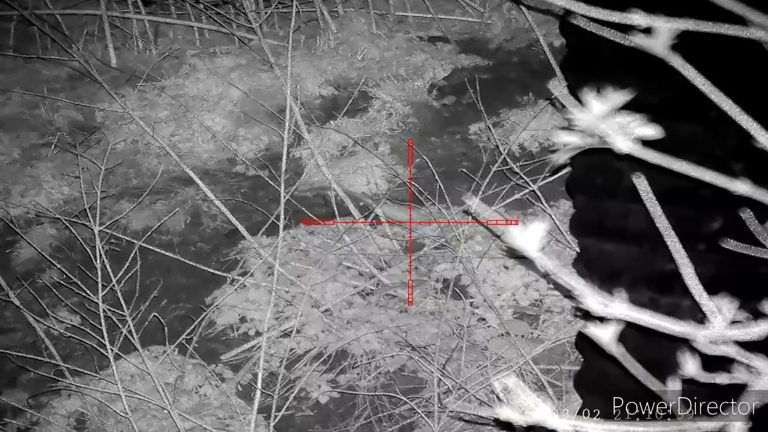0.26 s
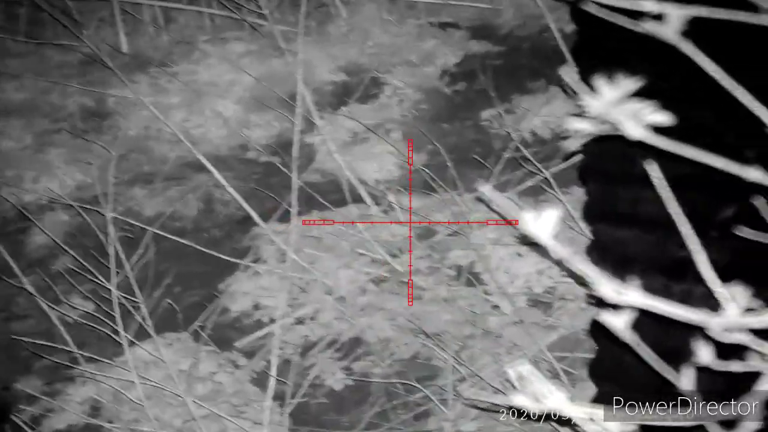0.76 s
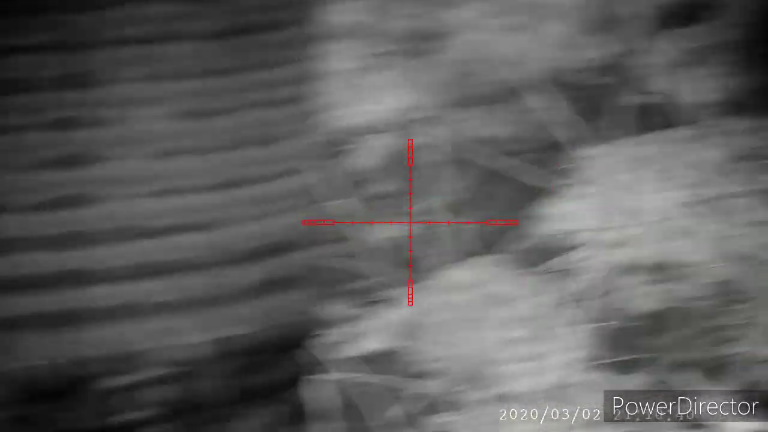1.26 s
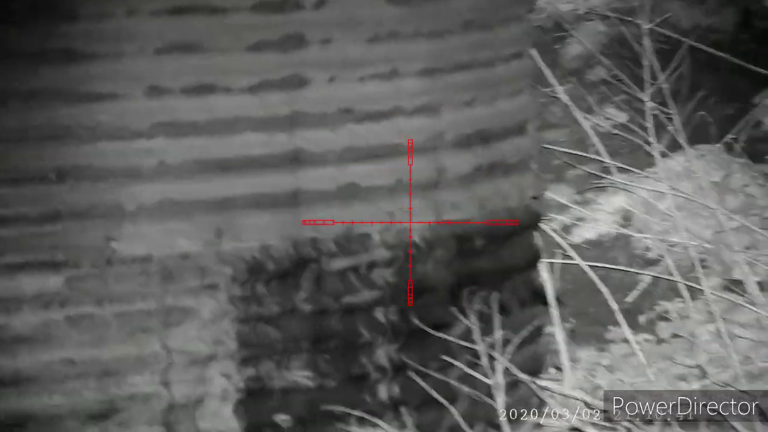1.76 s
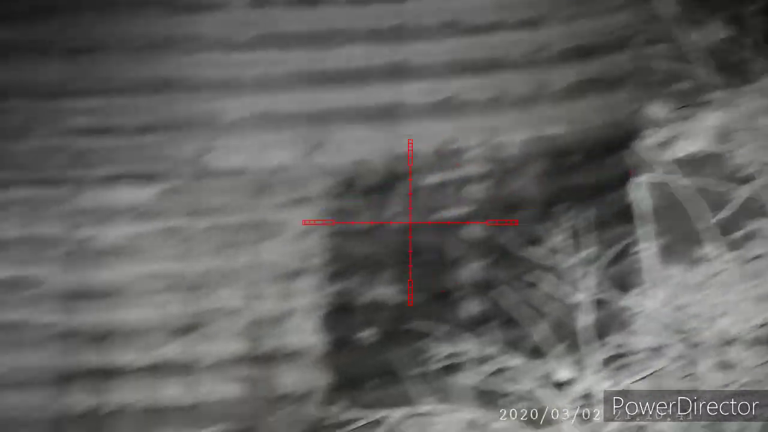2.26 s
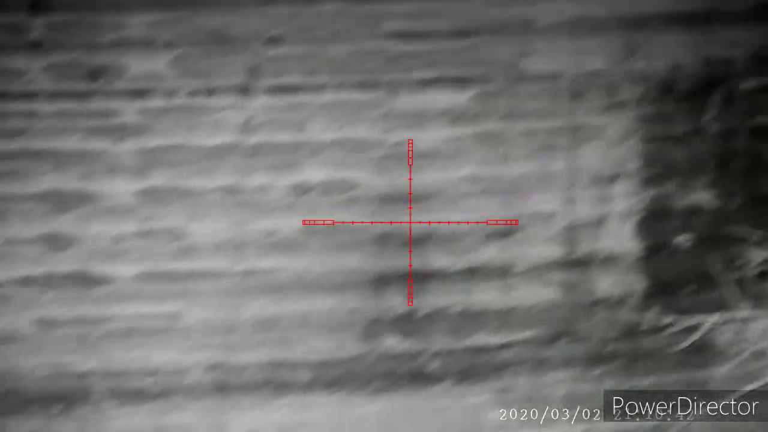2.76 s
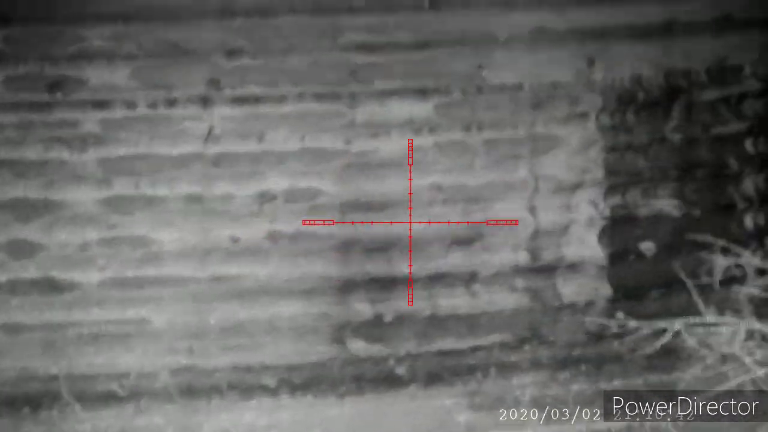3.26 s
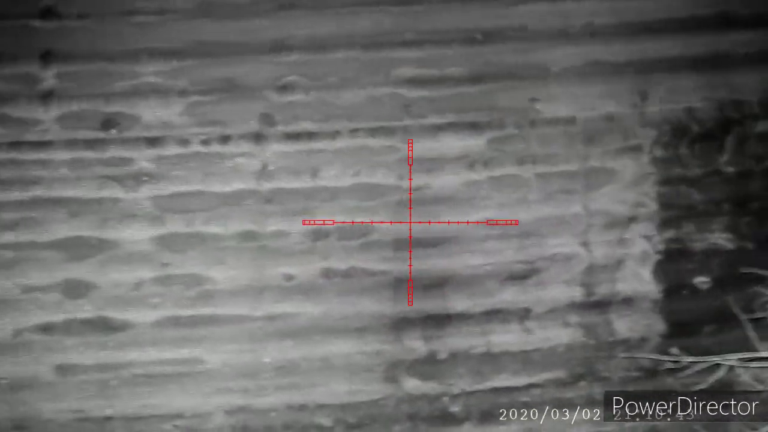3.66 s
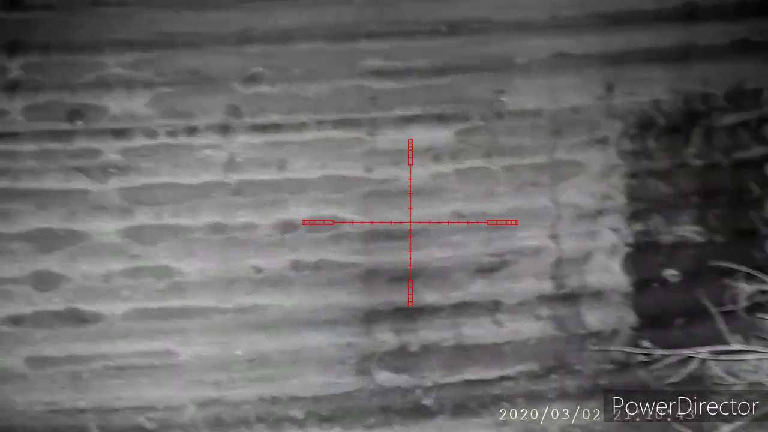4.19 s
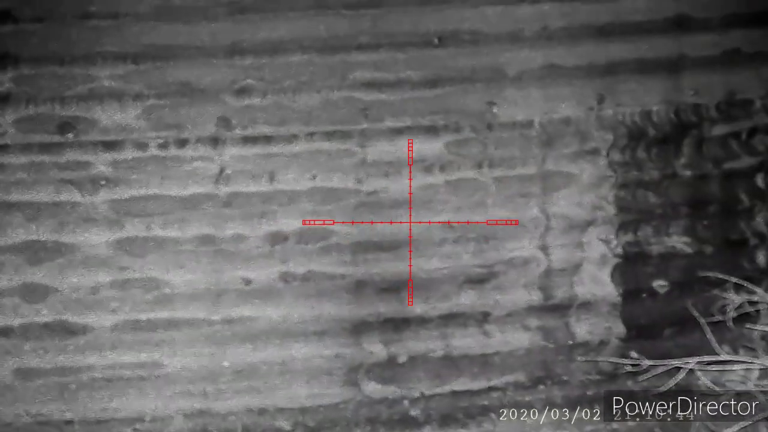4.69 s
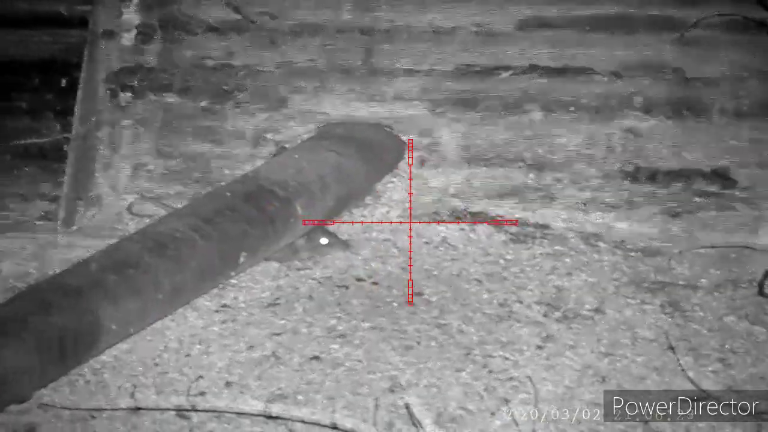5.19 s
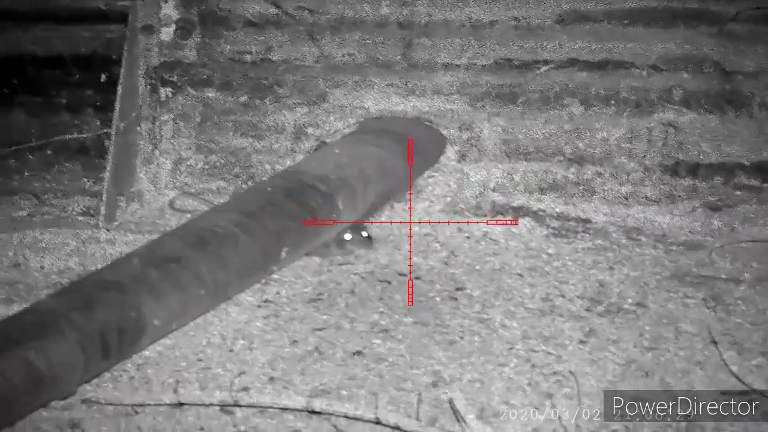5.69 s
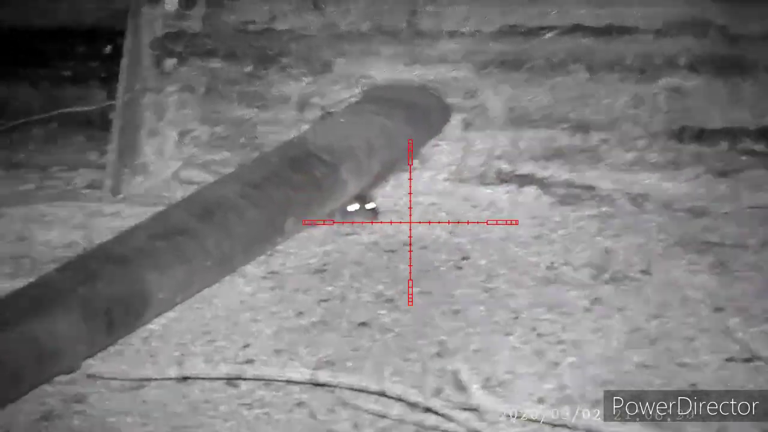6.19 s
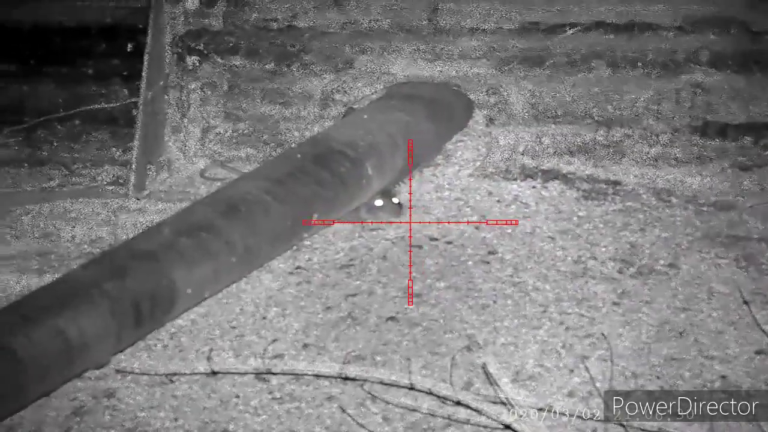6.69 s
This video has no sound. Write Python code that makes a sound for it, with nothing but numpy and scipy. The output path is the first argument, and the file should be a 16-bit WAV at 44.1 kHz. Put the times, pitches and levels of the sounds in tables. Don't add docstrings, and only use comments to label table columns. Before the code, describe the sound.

The built-in microphone sits right beside fingers on a hard housing, so contacts are dry, close and barely reverberant. Small ticks and scuffs grow into busy rubbing with low pressure bumps and one overloaded thud. Two bright, brittle snaps stand out, the second right after a momentary dropout and followed by quick clicks. Faint electronic hiss and high whine rise and fall throughout; the ending is nearly still.

```python
import sys
import numpy as np
from scipy import signal
from scipy.fft import rfft, irfft, next_fast_len
from scipy.io import wavfile
from scipy.ndimage import uniform_filter1d, map_coordinates

SR = 44100
rng = np.random.default_rng(int(sys.argv[2]) if len(sys.argv) > 2 else 0)


def put_to_file(sound):
    columns = np.atleast_2d(sound).T
    safe = np.clip(columns, -1, 1)
    whole_steps = np.round(safe * 32767)
    wavfile.write(sys.argv[1], SR, whole_steps.astype(np.int16))


def invert_db(x):
    u = np.asarray(x, float) / 20
    return 10 ** u


N = 306304
T = np.arange(N) / SR

# pitch_hz, t60_s, polarity, rubbed_db, tapped_db, first_snap_db, second_snap_db
HOUSING = [(1260, 0.013, 1, 7, 6, -42, -42.5), (1348, 0.03, 0.59, 3, 0, -37, -45.5),
           (1480, .045, 0.88, -9.5, 10.5, -23.5, -28), (1535, 0.016, 0.94, -1, -27.5, -27.5, -12),
           (1684, .012, -1, -3, -25, -30.5, -30), (1760, 0.025, -1.6, 0, 0, -29, -24.5),
           (2731, 0.016, 1, -5.5, -10, -10.5, -7), (3450, .015, 1, -1.5, -12.5, -1, -1),
           (4096, 0.017, 1, -7, -9, -8, -12.5), (4610, 0.0068, -0.47, -10, -10, -10, -29.5),
           (5210, 0.015, -1, 1.5, 3.5, -2, -11.5), (5496, 0.014, -1, 0, -7, -12.5, -14),
           (6175, 0.012, 0.97, 2, 2.5, -9, -10), (6830, .009, -0.65, -15, -16.5, -8.5, -20.5),
           (7190, 0.011, -1, -9, -3, 0, 2), (8460, 0.012, -1.4, -4, -9.5, -19, -5.5),
           (9710, 0.0073, -1, -22.5, -9, -26.5, -28.5), (12300, 0.0071, -1, -12.5, -5.5, -18, -14)]


def unit(x):
    return x / np.sqrt(np.mean(x ** 2) + 1e-20)


def peak_at(db, x):
    return invert_db(db) * x / np.abs(x).max()


def butter(order, hz, kind, x):
    return signal.sosfilt(signal.butter(order, hz, kind, fs=SR, output="sos"), x)


def wobble(rate_hz):
    knots = rng.standard_normal(int(N * rate_hz / SR) + 4)
    return map_coordinates(knots, [T * rate_hz])


def curve(rows):
    return np.interp(T, *np.transpose(rows))


def add(track, start_s, x):
    part = track[round(start_s * SR):][:len(x)]
    part += x[:len(part)]


def ring(hz, t60_s, size=4096):
    t = T[:size]
    onset = 1 - np.exp(-t / 0.000055)
    return np.sin(2 * np.pi * hz * t) * invert_db(-60 * t / t60_s) * onset


def group(index, tapped=False):
    groups_hz = [900, 1400, 1700, 2200, 4350, 14000]
    low, high = groups_hz[index:index + 2]
    modes = sum(sign * invert_db(db[tapped]) * ring(hz, t60) for hz, t60, sign, *db in HOUSING if low < hz < high)
    return peak_at(0, butter(1, [low, high], "band", modes))


def struck(answer, length_s, db, size=4096):
    u = T[:size] / max(length_s, 5e-5)
    force = rng.standard_normal(size) * u * np.exp(-u)
    return peak_at(db, signal.fftconvolve(force, answer)[:])


def stroke(start_s, length_s):
    grip, flat = 0.8, 0.85
    phase = np.clip((T - start_s) / length_s, 0, 1) ** grip
    return np.abs(np.sin(np.pi * phase)) ** flat


def electronics():
    # start_s, level_db
    gain = [(0, -64), (.6, -61.5), (.9, -58.5), (1.2, -57.5), (1.5, -54), (2.05, -58), (2.25, -53.5),
            (3.5, -56.5), (3.95, -61), (4.91, -62), (4.95, -70), (5.05, -67.5), (5.12, -54), (5.33, -55.5),
            (5.5, -60.5), (6.05, -59.5), (6.4, -62.5), (6.95, -62)]
    # pitch_hz, density_db_per_hz
    hiss_colour = [(15, -13), (30, -6.5), (110, -1), (250, -1), (500, -3.5), (1000, -8), (2000, -14.5),
                   (3200, -19), (6300, -23), (10000, -23), (11700, -28), (12400, -23.5), (13100, -26.5),
                   (15500, -37)]
    # pitch_hz, level_db re fundamental
    whine_tones = [(4032, 0), (8064, -4.5), (12096, -20), (12349, -24)]
    m = next_fast_len(N)
    hz, db = np.transpose(hiss_colour)
    colour = invert_db(np.interp(np.log(np.fft.rfftfreq(m, 1 / SR) + 1), np.log(hz + 1), db))
    hiss = unit(irfft(rfft(rng.standard_normal(m)) * colour, m)[:N])
    drift_rad = 0.25 * wobble(2.5)
    whine = np.zeros(N)
    for hz, db in whine_tones:
        phase = 2 * np.pi * hz * T + drift_rad * hz / whine_tones[0][0]
        whine += invert_db(db) * 2 ** 0.5 * np.sin(phase)
    level = invert_db(curve(gain) + wobble(9.9))
    return level * (hiss * invert_db(0.64 * wobble(30)) + invert_db(-10) * whine)


def sway():
    # start_s, heave_db
    heave = [(0, -81), (1.04, -76), (1.1, -50), (1.38, -40), (1.7, -52), (1.95, -52), (2.26, -35),
             (2.55, -42), (3.04, -39.5), (3.3, -48), (3.5, -47.5), (3.94, -54), (4.9, -53), (5.03, -42),
             (5.1, -49), (5.37, -60), (5.62, -62), (6.95, -80)]
    # top_s, signed_peak, half_width_s
    lurch_rows = [(1.095, -0.0035, .012), (1.315, -0.019, 0.021), (1.4, 0.0082, 0.03),
                  (1.45, 0.019, 0.0096), (1.503, -0.027, 0.018), (1.592, 0.015, 0.04), (1.815, 0.01, 0.035),
                  (2.002, -0.043, 0.03), (2.09, 0.022, 0.017), (2.27, 0.032, 0.021), (2.33, -0.026, 0.021),
                  (2.418, 0.026, 0.019), (2.48, -0.01, .025), (2.58, 0.026, 0.019), (2.635, -0.024, 0.034),
                  (2.775, -0.016, 0.033), (2.856, 0.016, 0.017), (2.895, -0.029, 0.018),
                  (2.97, 0.0077, 0.044), (3.016, -0.011, .008), (3.04, -0.014, 0.0098),
                  (3.072, -0.009, 0.0066), (3.1, 0.01, 0.013), (3.15, -0.0019, 0.012),
                  (1.989, -0.026, .006), (2.365, 0.0068, 0.011), (2.822, 0.0064, 0.013),
                  (3.62, -0.0014, 0.023), (3.67, 0.0026, .025), (5.42, 0.0012, .03), (5.5, -0.0017, 0.026),
                  (3.186, 0.016, 0.01), (3.251, -0.028, 0.028), (3.341, -0.016, .015), (3.41, 0.01, 0.033),
                  (5.065, 0.038, 0.019), (5.24, -0.017, 0.071), (5.341, -0.0035, 0.053)]
    # top_s, peak, half_width_s
    resume = (4.954, .006, .016)
    rumble_db, rumble_db_per_db, still_db, tremor_db = -58, 0.94, -70.5, -4
    heave_db = curve(heave)
    lumps = invert_db(3 * wobble(15))
    rumble = butter(2, [20, 90], "band", rng.standard_normal(N))
    grip = invert_db(rumble_db + rumble_db_per_db * (heave_db + 37)) * unit(lumps * rumble)
    grip += invert_db(still_db) * unit(rumble[::-1])
    lurches = sum(peak * np.exp(-np.abs((T - s) / width) ** 3.2) for s, peak, width in lurch_rows + [resume])
    tremor = invert_db(heave_db + tremor_db) * unit(wobble(20) + 1.6 * wobble(45))
    return lurches + tremor + grip


def pushes():
    # top_s, signed_peak, rise_s, fall_s, rebound_share
    push_rows = [(1.271, 0.022, 0.02, 0.0024, 0.55), (1.561, -.03, 0.00052, 0.006, 0.11),
                 (1.747, 0.034, 0.012, 0.011, 0.44), (1.765, .02, .003, 0.0028, .2),
                 (1.779, -0.16, 0.0048, 0.0017, 0.18), (1.7917, -0.067, 0.005, 0.00089, 0.19),
                 (1.795, -0.08, 0.0015, 0.00047, 0.24), (1.797, -.06, .002, 0.002, 0.028),
                 (1.9686, 0.85, 0.0061, .0021, 0.52), (2.393, -0.018, 0.0038, 0.0035, .1),
                 (2.403, -.03, .003, .004, 0.18), (5.145, -.035, 0.0003, 0.00025, 0),
                 (2.244, -0.071, 0.0026, 0.0051, 0.1), (2.726, 0.044, 0.021, 0.011, 0),
                 (3.3283, 0.061, 0.00082, 0.0019, 0), (5.0485, -0.37, 0.00089, 0.003, 0.00077),
                 (5.016, -0.024, 0.046, 0.05, 0.0033), (4.9482, .002, .0001, .0001, 0),
                 (5.127, 0.064, 0.067, 0.032, 0), (5.1134, -0.14, 0.00031, 0.00022, 0),
                 (5.1137, -0.089, 0.0025, 0.0024, 0.0098)]
    out = np.zeros(N)
    for s, peak, rise, fall, rebound in push_rows:
        t = T - s
        u = np.clip(t, 0, None) / fall
        collapse = np.exp(-u ** 2)
        back = 2.1 * (1 - collapse) * np.exp(-u / 3) * np.cos(0.5 * (u - 1.5))
        ramp = np.sin(np.pi / 2 * np.clip(1 + t / rise, 0, 1)) ** 2
        out += peak * np.where(t < 0, ramp, collapse - rebound * back)
    return out


def knocks():
    # start_s, level_db, pitch_hz, t60_s, swell_s
    knock_rows = [(0.605, -45, 131, 0.33, 0.011), (0.896, -38.5, 142, 0.17, 0.0082),
                  (.899, -38, 413.7, 0.15, 0.0075), (.887, -41.5, 450, .07, .004),
                  (0.89, -35, 205, 0.08, 0.0056), (0.896, -46, 310, 0.086, 0.0048),
                  (1.082, -47.5, 140, 0.12, 0.0048), (2.188, -44, 122, 0.065, .008),
                  (2.374, -40, 105.8, .07, .008), (5.0494, -38.5, 950, 0.0071, 0.00022),
                  (0.7522, -50, 1967, 0.027, 0.001), (.7516, -45, 2670, 0.039, 0.00049),
                  (6.033, -48, 1454, 0.047, 0.001), (6.0368, -29.5, 1470, 0.034, 0.001),
                  (6.0371, -34, 1872, 0.032, 0.00078), (6.038, -50, 2610, 0.022, 0.00072),
                  (6.041, -49.5, 184, 0.07, 0.008), (6.044, -45.5, 1460, .12, 0.0032),
                  (6.06, -54, 124, 0.17, 0.017), (2.963, -47, 3450, 0.031, 0.0026),
                  (2.963, -54, 2740, .025, .002), (5.1132, -42, 11900, .008, .0002),
                  (1.9623, -26.5, 1410, 0.016, 0.00041), (1.9623, -36, 2610, .014, 0.00035),
                  (1.9623, -37.5, 1830, .016, .0004), (3.3266, -19, 8360, .011, .0002),
                  (3.3272, -27, 3850, .006, .0003), (3.3272, -25, 3050, .005, .0003),
                  (5.048, -24, 1535, .02, .0004), (5.1132, -40.5, 8700, .008, .0002),
                  (2.385, -42, 62, .12, .006)]
    # start_s, level_db, pitch_hz, t60_s, length_s
    rasps = [(0.892, -39, 318, 0.017, 0.039), (.9, -53, 610, .02, .015), (2.5, -43, 260, .02, 0.022),
             (0.89, -47.5, 6080, 0.019, 0.015), (1.35, -51, 3800, .02, 0.027),
             (1.558, -38, 215, 0.013, 0.019), (1.773, -24.5, 630, 0.0074, 0.015),
             (1.787, -30, 490, 0.0097, 0.01), (1.783, -31, 1130, 0.0072, 0.013),
             (1.95, -27, 700, 0.0051, 0.0032), (6.055, -54, 1455, .05, 0.033),
             (1.562, -46, 3700, .02, 0.013), (1.565, -45, 4150, .015, .02), (1.83, -43, 4200, .015, .008),
             (1.81, -36, 4130, .013, 0.0067), (1.4, -42.5, 1040, .015, 0.0093),
             (2.225, -49, 5000, 0.014, .025), (2.1, -54, 6500, .012, .025)]
    out = np.zeros(N)
    for s, db, hz, t60, swell in knock_rows:
        x = ring(hz, t60, size=16384) * (1 - np.exp(-T[:16384] / swell)) ** 2
        add(out, s, peak_at(db, x))
    for s, db, hz, t60, length in rasps:
        add(out, s, struck(ring(hz, t60, size=8192), length / 2.5, db, size=8192))
    return butter(2, 60, "high", out)


def slipping():
    return invert_db(1.5 * wobble(70) + 3 * wobble(400)) * rng.standard_normal(N)


def rubbing():
    # start_s, level_db
    creep_rows = [(0, -80), (.33, -102), (.62, -61.5), (1.2, -63), (1.45, -54.5), (1.8, -58), (2.3, -71),
                  (2.45, -57), (2.7, -56.5), (3.3, -70.5), (4.1, -83), (4.65, -65), (4.9, -80), (5.15, -83),
                  (5.37, -58.5), (5.5, -68), (5.98, -76), (6.95, -66)]
    # start_s, length_s, hollow_db, belly_rel_db, upper_rel_db
    scrapes = [(0.891, 0.05, -54, -24, -11), (0.933, 0.065, -62, -15, -10), (1.243, 0.088, -53, -5, -8.5),
               (1.329, 0.11, -56, -6, -2), (1.446, 0.044, -66, -6, -10), (1.553, 0.055, -49.5, 3, -16),
               (1.589, 0.0775, -49, 1, -18), (1.745, 0.033, -53, -4, -6.5), (1.771, 0.03, -44, 2, -3.5),
               (1.857, 0.07, -60.5, -15, -5), (2.056, 0.099, -60, -8, -0.5), (2.197, 0.077, -54.5, -4, 0),
               (2.337, .03, -56, -6, -9), (2.363, 0.058, -48.5, -1.5, -9.5), (2.516, 0.053, -56, -3, -2.5),
               (2.594, .03, -62, 2, -7), (2.698, .035, -54.5, -3, -4), (2.262, .08, -70, -3, -3),
               (2.415, .09, -69, -6, 1), (2.951, 0.064, -72.5, 9, 11.5), (3.198, 0.047, -69.5, -1, 6),
               (5.116, 0.026, -58.5, -8, -2), (5.219, 0.17, -71.5, -7, -1)]
    # start_s, length_s, level_db
    sings = [(0.563, 0.15, -62), (0.898, 0.038, -54), (1.033, 0.079, -57), (1.113, 0.045, -65.5),
             (5.34, 0.15, -68.5), (5.64, .22, -66.5), (5.86, .05, -68), (5.98, 0.036, -68.5),
             (6.049, 0.15, -67.5), (6.211, 0.09, -68), (6.292, .12, -65), (6.419, 0.053, -69)]
    creep_middle_db, creep_bright_db = -14, -12
    scrape_bright_db = -8
    sing_hz, sing_t60_s = 1471, 0.079

    creep = invert_db(curve(creep_rows) - 10 + wobble(7.1))
    drive = np.array([0, 1, invert_db(creep_middle_db), invert_db(creep_bright_db)])[:, None] * creep
    for s, length, db, belly_db, upper_db in scrapes:
        shares = invert_db(db + np.array([belly_db, 0, upper_db, upper_db + scrape_bright_db]))
        drive += shares[:, None] * stroke(s, length)
    hum = np.array([unit(signal.fftconvolve(slipping(), group(k))[:N]) for k in (0, 1, 3, 4)])
    airborne = unit(butter(2, [4500, 13000], "band", slipping()))
    scratch = unit(butter(1, [400, 1900], "band", slipping()))
    song = unit(signal.fftconvolve(rng.standard_normal(N), ring(sing_hz, sing_t60_s))[:N])
    singing = song * sum(invert_db(db) * stroke(s, length) for s, length, db in sings)
    direct = invert_db(-2) * drive[3] * airborne + invert_db(-7.5) * (drive[0] + drive[2]) * scratch
    return singing + (drive * hum).sum(axis=0) + direct


def taps():
    # start_s, hollow_peak_db, middle_rel_db, bright_rel_db, grip_damping_t60_s
    hard = [(0.7513, -36, -2, 1, 1), (1.5067, -48.5, 3, 10.5, .026), (1.499, -61, 5, 14, .02),
            (1.9624, -39, 6.5, 7.5, 0.014), (1.9652, -45.5, 16, 14, 0.03), (2.058, -50, 2, -6, .03),
            (2.7362, -55, 2, 11.5, .02), (2.966, -48, 4, -13, 0.037), (5.1126, -25, -0.5, -6.5, 0.03),
            (5.1445, -39, -7, -3, 0.028), (5.176, -54, 5, -4, .02), (6.037, -50, 6, -3, 0.032),
            (2.598, -56, 0, 5, .02), (3.134, -59, 11, 2, .02)]
    # start_s, hollow_peak_db, upper_rel_db
    soft = [(.225, -62, -12), (0.612, -48, -23), (0.644, -53, -20), (.89, -43.5, -9), (0.906, -42.5, -6),
            (1.0709, -48, -22), (1.16, -48.5, -17), (1.256, -45, -19), (1.3753, -51, -5), (1.557, -53, -9),
            (1.577, -54, -12), (1.742, -38.5, -21), (1.7802, -21.5, -19), (1.7926, -34, -12),
            (1.902, -57, -13), (2.272, -47.5, -20), (2.347, -46, -14), (2.383, -42, -15), (2.539, -43, -11),
            (2.5964, -49, -17), (3.059, -52, -18), (3.193, -46, -20), (3.48, -46, -13), (3.711, -42, -16),
            (3.7238, -47, -10), (4.3066, -46, -13), (4.6416, -46, -15), (4.827, -48, -20),
            (5.824, -54.5, -17)]
    hard_second_db, soft_second_db = -17, -14
    contact_s, soft_bright_db = 0.0022, -1
    out = np.zeros(N)
    groups = np.array([group(k, tapped=True) for k in (1, 2, 3, 4)])
    t = T[:groups.shape[1]]
    for s, db, middle_db, bright_db, t60 in hard:
        shares = invert_db(db + np.array([0, hard_second_db, middle_db, bright_db]))
        add(out, s, shares @ groups * invert_db(-60 * t / t60))
    swell = (1 - np.exp(-t / (0.92 * contact_s))) ** 2 * np.exp(-(t / (7 * contact_s)) ** 2)
    blip = (groups[0] + invert_db(soft_second_db) * groups[1]) * swell
    for s, db, upper_db in soft:
        add(out, s, peak_at(db, blip))
        add(out, s, struck(groups[2], contact_s, db + upper_db))
        add(out, s, struck(groups[3], contact_s, db + upper_db + soft_bright_db))
    return out


def snaps():
    # start_s, strongest_mode_db
    snap_rows = [
        (3.3265, -6.8),
        (5.04773, -5.6),
    ]
    chatter_s, chatter_db = 0.0022, -27
    out = np.zeros(N)
    for k, (s, db) in enumerate(snap_rows):
        answer = sum(sign * invert_db(snap_db[k]) * ring(hz, t60) for hz, t60, sign, _, _, *snap_db in HOUSING)
        add(out, s, invert_db(db) * answer)
        add(out, s, struck(answer, chatter_s / 2, chatter_db))
    return out


def scene():
    return (electronics() + sway() + pushes() + knocks() + rubbing() + taps() + snaps())[None]


def narrowed(x):
    # start_s, end_s
    spans = [(.731, .758), (1.762, 1.814), (1.947, 1.974), (3.321, 3.349), (5.04, 5.075), (6.036, 6.064)]
    steep = signal.firwin(353, 8540, window=("kaiser", 3.5), fs=SR)
    low = signal.fftconvolve(x, steep[None], "same", axes=1)
    narrow = sum((T > a) & (T < b) for a, b in spans)
    return x + uniform_filter1d(narrow * 1.0, size=90) * (low - x)


def starved(x):
    floor_hz, empty_share = 12700, 0.3
    hz, t, z = signal.stft(x, SR, nperseg=1024)
    cells = rng.random((len(hz) // 5 + 1, len(t) // 3 + 1))
    cells = cells.repeat(5, axis=0).repeat(3, axis=1)[:len(hz), :len(t)]
    empty = (cells < empty_share) & (hz[:, None] > floor_hz)
    return signal.istft(z * np.where(empty, invert_db(-23.0), 1), SR, nperseg=1024)[1][:, :N]


def band_limit(x):
    return signal.sosfilt(signal.butter(12, 15480, fs=SR, output="sos"), x)


def record(dry):
    # start_s, end_s of the silence
    splice = (4.916, 4.9481)
    x = narrowed(dry)
    x = x / (1 + np.abs(x / 1.01) ** 24) ** (1 / 24)
    x = starved(x) * ((T < splice[0]) | (T > splice[1]))
    return band_limit(x)


dry = scene()
out = record(dry)
put_to_file(out)
```